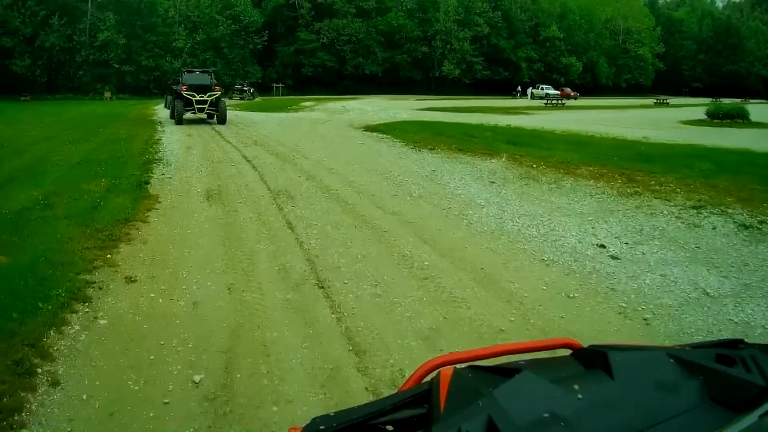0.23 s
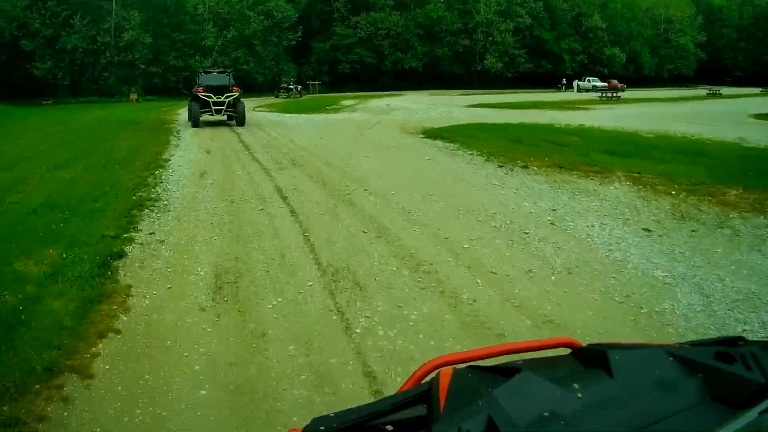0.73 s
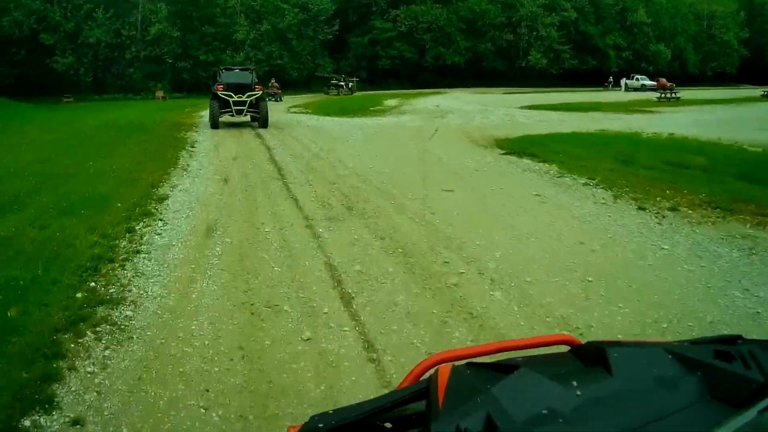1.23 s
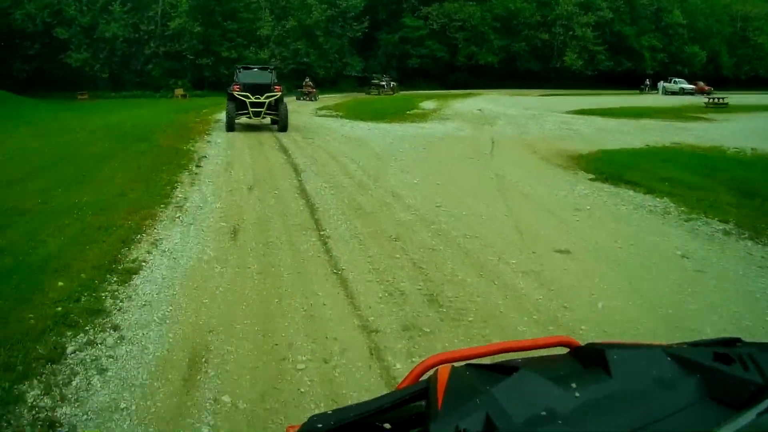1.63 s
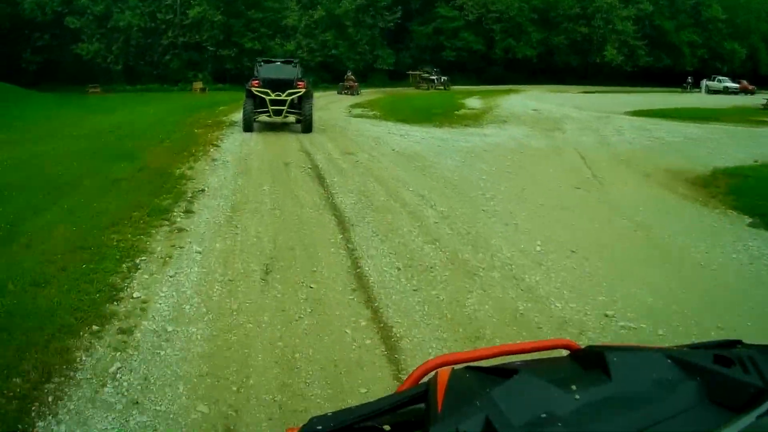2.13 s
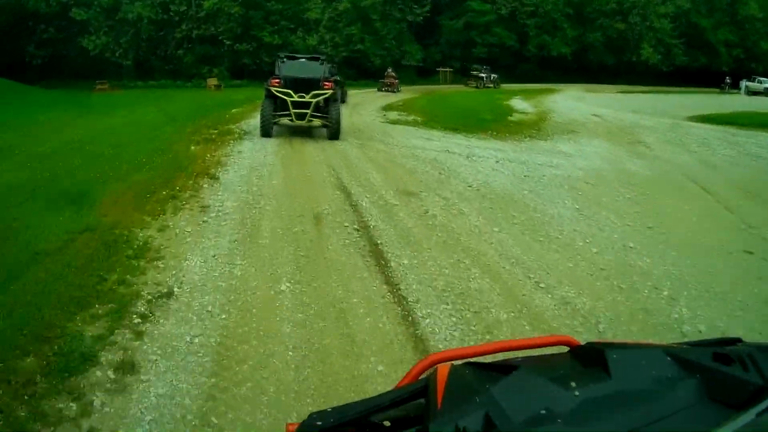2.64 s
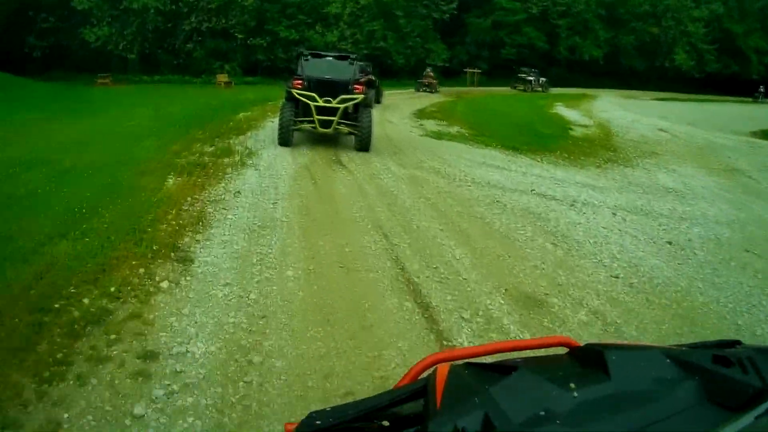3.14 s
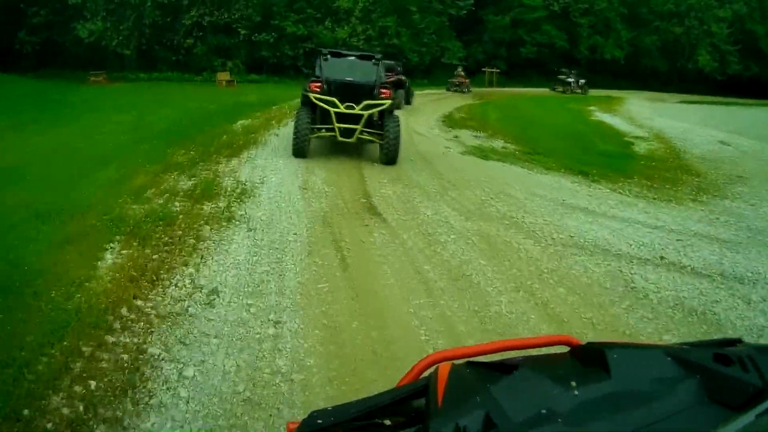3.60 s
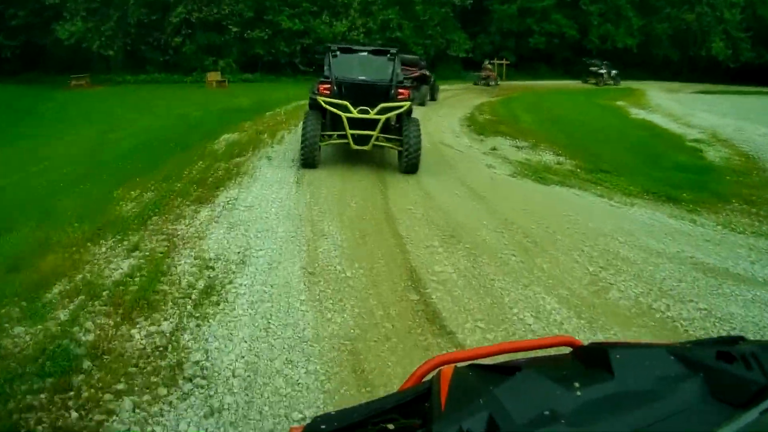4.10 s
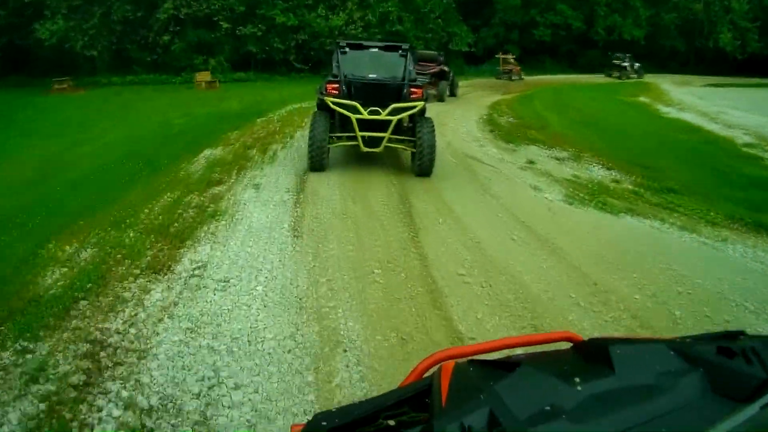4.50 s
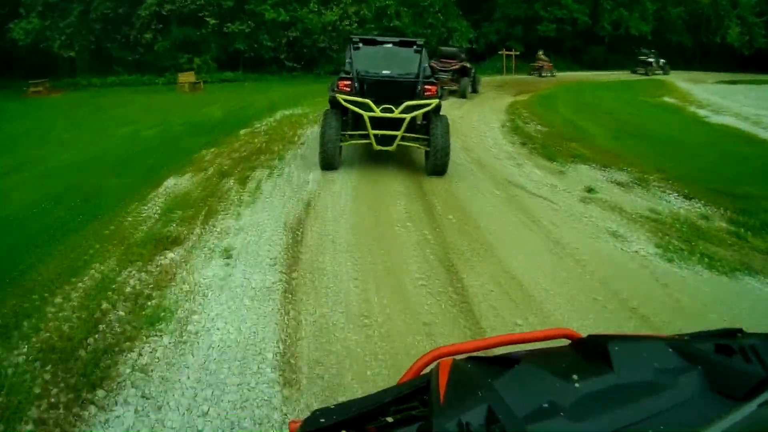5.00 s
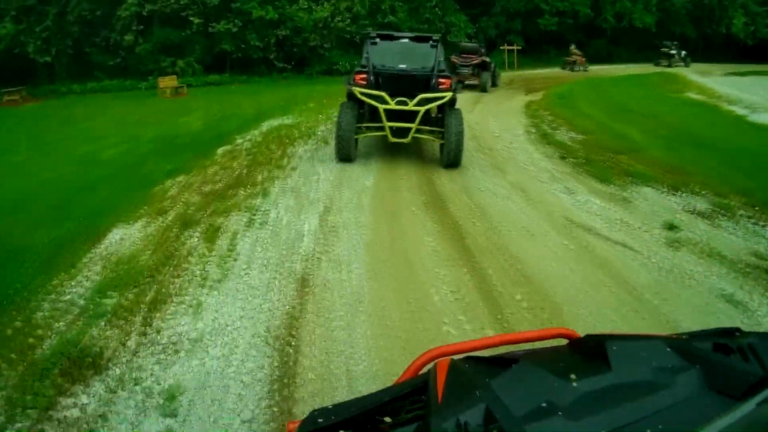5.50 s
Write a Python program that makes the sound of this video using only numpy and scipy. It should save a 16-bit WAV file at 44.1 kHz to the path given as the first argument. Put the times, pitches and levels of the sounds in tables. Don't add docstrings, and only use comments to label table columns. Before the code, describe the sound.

Outdoors on a gravel road, close onboard sound: twin-cylinder exhaust growl, body roar and rumble, bright tyre crunch and wind gusts. The engine eases down from about two seconds, with loose panel rattles and stone ticks, then coasts from three. Knocks come in quick clusters, another engine's low drone rises, gravel gets looser, and the throttle bites again near the end.

```python
import sys
import numpy as np
from scipy import signal
from scipy.io import wavfile
from scipy.ndimage import uniform_filter1d

SR = 44100
rng = np.random.default_rng(int(sys.argv[2]) if len(sys.argv) > 2 else 0)


def output_pcm(signal):
    pcm = np.clip(np.atleast_2d(signal).T, -1, 1) * 32767
    wavfile.write(sys.argv[1], SR, np.round(pcm).astype(np.int16))


def convert_level_to_amplitude(level_db):
    exponent = np.asarray(level_db, float) / 20
    return 10 ** exponent


N = 253575


def evened(x):
    return x / np.sqrt(np.mean(x ** 2) + 1e-20)


def read(points, hz):
    f, value = np.transpose(points)
    return np.interp(np.log(hz + 1), np.log(f + 1), value)


def curve(rows):
    s, value = np.transpose(rows)
    return np.interp(np.arange(N) / SR, s, value)


def drift(hz, count):
    steps = rng.standard_normal((count, 1200))
    smooth = signal.filtfilt(*signal.butter(2, hz / 100), steps)
    at = np.arange(N) / SR * 200
    return [np.interp(at, np.arange(1200), evened(row)) for row in smooth]


def noise(spectrum, size, patchy_db, flicker_db):
    frames, hz = 4 * N // size + 5, np.fft.rfftfreq(size, 1 / SR)
    a, b, patches = rng.standard_normal((frames, len(hz), 3)).T
    patches = uniform_filter1d(patches, size=6, axis=0)
    patches = evened(uniform_filter1d(patches, size=8, axis=1))
    flicker = evened(uniform_filter1d(rng.standard_normal(frames), size=3))
    level_db = read(spectrum, hz)[:, None] + patchy_db * patches + flicker_db * flicker
    z = (a + 1j * b) * convert_level_to_amplitude(level_db)
    return evened(signal.istft(z, nperseg=size, noverlap=3 * size // 4)[1][:N])


def ring(hz, t60):
    t, rise_s = np.arange(3000) / SR, .0007
    return np.minimum(t / rise_s, 1) * convert_level_to_amplitude(-60 * t / t60) * np.sin(2 * np.pi * hz * t)


# time in seconds, firing cycles per second.
SPEED = [(0, 41.45), (.72, 41.58), (1.4, 41.45), (1.56, 40.75), (1.7, 39.2), (1.924, 37.52), (2.138, 36.63),
         (2.6, 35.77), (2.772, 34.37), (2.948, 33.6), (3.2, 30.3), (3.55, 28.7), (4.5, 25.85),
         (5.11, 22.45), (5.3, 28.2), (5.42, 29.35), (5.62, 29.35), (5.75, 30.2)]


def engine_speed():
    return curve(SPEED)


# time in seconds, opening from 0 (shut) to 1 (open).
THROTTLE = [
    (0, 1.),
    (2.6, 1.),
    (2.92, .75),
    (3.05, .08),
    (5.09, .03),
    (5.16, .9),
    (5.3, 1.),
    (5.75, 1.),
]


def throttle_opening():
    return curve(THROTTLE)


# pitch in Hz, width in Hz, level in dB.
PIPE = [(111.4, 26, 9.5), (274.3, 19.6, 13.5), (355.4, 64, 9), (460, 5.1, 8.5), (544, 21, 12), (706, 58, 8),
        (1000, 4.3, -6), (1363, 29, 8)]


def pipe(hz):
    return 1 + sum(convert_level_to_amplitude(db) / (1 + 2j * (hz - f) / width) for f, width, db in PIPE)


# time in seconds, level in dB.
EFFORT = [(0, -9), (1.3, -9), (1.42, -9.5), (1.56, -10.5), (1.68, -8), (2.0, -9), (2.6, -10), (3.0, -8.5),
          (3.15, -12), (4.4, -12.5), (4.8, -11), (5.12, -9.5), (5.2, -13.5), (5.35, -8.5), (5.55, -8),
          (5.75, -9.5)]
# multiple of firing cycle, level in dB.
PULLING = [(1, -6.5), (2, -23), (3, -22), (4, 2.5), (5, -12), (6, -9), (7, -21), (8, -6.5), (9, 1.5),
           (10, -6.5), (11, -1), (12, 7), (13, -7), (14, -11.5), (15, -35), (16, -6), (17, -5), (18, -25.5),
           (19, -31.5), (20, -29), (21, -20), (22, -24), (23, -28.5), (24, -6), (25, -31), (26, -16),
           (27, -21.5), (28, -12.5), (29, -14.5), (30, -28.5), (31, -33), (32, -22), (33, -26), (34, -15.5)]
FADING = [(1, -8), (2, -27), (3, -16), (4, 6), (5, -21), (6, -26.5), (7, -6), (8, 2.5), (9, 1.5), (10, -4),
          (11, 0.5), (12, -5.5), (13, -11), (14, -7), (15, -17), (16, -4), (17, -21), (18, -14.5),
          (19, -19), (20, -24), (21, -3), (22, -11.5), (23, -15), (24, -13), (25, -13), (26, -18.5),
          (27, -23), (28, -28), (29, -17), (30, -31), (31, -27), (32, -28), (33, -16), (34, -26.5)]
EASING = [(1, -4.5), (2, -19), (3, -10), (4, -17), (5, -8), (6, -31), (7, -7.5), (8, 0), (9, 3.5), (10, -2),
          (11, -4.5), (12, -15.5), (13, -3), (14, -25), (15, -9), (16, -12.5), (17, -32), (18, -17),
          (19, -35), (20, -7.5), (21, -16.5), (22, -14), (23, -12), (24, -39), (25, -29.5), (26, -24),
          (27, -16.5), (28, -10.5), (29, -25), (30, -39), (31, -22.5), (32, -25), (33, -36), (34, -23.5)]
SETTLING = [(1, -19), (2, -8), (3, -14.5), (4, -10), (5, -1.5), (6, -12), (7, -1), (8, -3), (9, 5),
            (10, -1.5), (11, -18), (12, -19), (13, -14.5), (14, -12.5), (15, -11.5), (16, -12), (17, -35),
            (18, -11.5), (19, -12), (20, -11.5), (21, -25), (22, -10), (23, -16), (24, -19), (25, -28.5),
            (26, -15.5), (27, -12.5), (28, -15.5), (29, -25.5), (30, -19), (31, -29), (32, -18.5),
            (33, -39), (34, -22)]
LIFTING = [(1, -2.5), (2, -10), (3, -5.5), (4, -6.5), (5, -12), (6, -15), (7, -2.5), (8, -3), (9, 3),
           (10, -17), (11, -21.5), (12, -5.5), (13, -9), (14, -11.5), (15, -29), (16, -25.5), (17, -13.5),
           (18, -3.5), (19, -29), (20, -23), (21, -11.5), (22, -14), (23, -15.5), (24, -19.5), (25, -14.5),
           (26, -23), (27, -19), (28, -16.5), (29, -32.5), (30, -24.5), (31, -35), (32, -28), (33, -24),
           (34, -30)]
CRUISING = [(1, 1), (2, -14.5), (3, -13), (4, -5.5), (5, -8.5), (6, -9.5), (7, -14.5), (8, 2), (9, 3.5),
            (10, -7.5), (11, -47), (12, -11), (13, -5.5), (14, -30), (15, -16.5), (16, -46.5), (17, -6),
            (18, -18), (19, -18), (20, -20.5), (21, -16), (22, -35), (23, -30.5), (24, -10), (25, -14.5),
            (26, -32.5), (27, -22.5), (28, -29.5), (29, -41), (30, -46), (31, -22), (32, -39.5), (33, -22),
            (34, -26)]
# multiple of firing cycle, level in dB.
COASTING = [(1, -12), (2, -7), (3, -4), (4, -7), (5, -13.5), (6, -16), (7, -21), (8, -12.5), (9, -15),
            (10, -18.5), (11, -22), (12, -17.5), (13, -23), (14, -23), (16, -21), (17, -24), (20, -32),
            (34, -37)]


def engine(turns):
    hz, throttle = engine_speed(), throttle_opening()
    speeds = np.array([29.3, 34.1, 36.1, 37.1, 38.8, 41.5])
    patterns = np.array([PULLING, FADING, EASING, SETTLING, LIFTING, CRUISING])
    trims_db = [[-3.0, 0.0036, 0.006, 0, 0.0019, 0.0052]]
    patterns_db = patterns[:, :, 1].T + trims_db
    swing = np.exp(2j * np.pi * np.interp(hz, [29.3, 34.1], [0, -.18]))
    shut_cutoff_hz, shut_lag_turns = 55.5, .19
    out = np.zeros(N)
    for k, (db, wobble) in enumerate(zip(patterns_db, drift(9.5, count=len(CRUISING))), 1):
        source_db = db - 20 * np.log10(abs(pipe(k * speeds)))
        loaded = convert_level_to_amplitude(np.interp(hz, speeds, source_db)) * swing
        shut = convert_level_to_amplitude(read(COASTING, k) + 2.0) / (1 + (shut_cutoff_hz / (k * hz)) ** 4)
        shut = shut * np.exp(-2j * np.pi * k * shut_lag_turns)
        wobble_db = (-0.11 + 1.17 * (2 - throttle)) * min(k / 6, 1) * wobble
        size = (throttle * loaded + (1 - throttle) * shut) * convert_level_to_amplitude(wobble_db)
        lag = 2 * np.pi * k * (turns - .34 - max((k + 1) // 4 - 2, 0) / 3)
        out -= (size * pipe(k * hz) * np.exp(1j * lag)).real
    return convert_level_to_amplitude(curve(EFFORT) - 7.5) * out


# time in seconds, level in dB above packed track.
GRAVEL = [(0, 0.2), (.45, -2.3), (1.0, 2), (1.5, -0.4), (2.45, 5.5), (3.15, 4), (3.6, 4.5), (3.9, 4),
          (4.2, 5.5), (4.35, 11.5), (5.5, 9.5), (5.75, 9)]


def looseness_db():
    return curve(GRAVEL)


# pitch in Hz, level in dB.
HISS = [(1500, -1.5), (2400, -17), (3000, -12), (3400, 0.5), (3900, -2), (4500, -9.5), (5350, -2),
        (6450, -9.5), (7000, -14.5), (7450, -17), (8000, -15), (8500, -18.5), (9200, -17.5), (10200, -9),
        (10700, -14), (11300, -24.5), (12500, -22.5), (14000, -31), (16000, -34.5)]


def gravel_hiss():
    grains_per_s = 310
    grit = convert_level_to_amplitude(1.4 * np.minimum(rng.exponential(1, N), 4)) * (rng.random(N) < grains_per_s / SR)
    puffs = uniform_filter1d(signal.lfilter([1], [1, -.97], grit), size=24)
    hiss = (1 + 0.025 * puffs) * noise(HISS, size=256, patchy_db=1.0, flicker_db=.8)
    return convert_level_to_amplitude(-50 + looseness_db()) * evened(hiss)


def firing_throb(turns):
    throb = 1 + 0.087 * np.cos(2 * np.pi * turns) + 0.13 * np.cos(8 * np.pi * turns)
    lump = 4 * np.cos(np.pi * (turns - 0.65)) ** 8 - 1
    return throb + 0.066 * (1 - throttle_opening()) * lump


# pitch in Hz, level in dB.
ROAR = [(80, -20), (150, -11.5), (270, -12.5), (370, -3.5), (450, -15.5), (600, -12.5), (1050, -19),
        (1200, -22), (1550, -24.5), (1760, -27.5), (1900, -31.5), (2300, -34), (3000, -45.5), (5000, -85.5)]


def body_roar(turns):
    roar_db = -23.5 + 0.64 * looseness_db() - 1.5 * (1 - throttle_opening())
    return convert_level_to_amplitude(roar_db) * firing_throb(turns) * noise(ROAR, size=1024, patchy_db=1.5, flicker_db=1.0)


# pitch in Hz, level in dB per Hz.
RUMBLE = [(50, -19), (90, -4), (150, 1), (220, -8), (300, -25.5)]
RUMBLE_END = [(600, -80), (1500, -140)]


def body_rumble(turns):
    low = noise(RUMBLE + RUMBLE_END, size=2048, patchy_db=-0.5, flicker_db=2.8)
    return convert_level_to_amplitude(-21) * firing_throb(turns) * low


# time in seconds, lift in dB, length in seconds.
GUSTS = [
    (0.382, 3, 0.083),
    (0.866, 7, 0.093),
    (1.3, 8, 0.074),
    (1.895, 1.5, 0.33),
    (2.292, 7.5, 0.45),
    (3.144, 14, 0.2),
    (3.83, 11, 0.083),
    (4.11, 4.5, 0.22),
]
# pitch in Hz, level in dB per Hz.
THUMP = [(15, -3), (27, 2.5), (40, 4), (60, -6.5), (110, -4.5), (150, -6), (220, -9), (400, -24),
         (800, -60), (1500, -130)]


def wind():
    t = np.arange(N) / SR
    gusts_db = sum(db * np.exp(-((t - s) / length) ** 2) for s, db, length in GUSTS)
    level_db = -24 + 0.23 * (engine_speed() - 41.5) + gusts_db
    return convert_level_to_amplitude(level_db) * noise(THUMP, size=4096, patchy_db=0.5, flicker_db=2.5)


def panel_buzz(turns):
    pitch_hz, width_hz = 1637, 223
    near = np.exp(-((engine_speed() - 36.0) / .22) ** 2) + convert_level_to_amplitude(-1.5) * throttle_opening()
    band = signal.butter(2, [pitch_hz - width_hz / 2, pitch_hz + width_hz / 2], "band", fs=SR)
    chopped = rng.standard_normal(N) * np.exp(-(turns % 1) / 1.6)
    return convert_level_to_amplitude(-38) * near * evened(signal.lfilter(*band, chopped))


# multiple of firing cycle, level in dB.
WHINE = [(54, -50), (59, -57.5), (68, -60.5), (154, -70)]


def gear_whine(turns):
    wobbles = drift(17, count=len(WHINE))
    whine = sum(convert_level_to_amplitude(db + 3.6 * w) * np.sin(2 * np.pi * k * turns) for (k, db), w in zip(WHINE, wobbles))
    return convert_level_to_amplitude(9 * (engine_speed() - 41.5)) * whine


# pitch in Hz, level in dB per Hz.
CLATTER = [(2200, -15), (2800, 3), (3500, -3.5), (4400, -12), (5050, -2), (5800, -23.5), (6400, -14.5),
           (7000, -18), (10500, -15), (16000, -37)]


def valve_clatter(turns):
    clatter = noise(CLATTER, size=512, patchy_db=-0.5, flicker_db=2.5)
    level_db = -52 + 0.3 * (engine_speed() - 41.5)
    return convert_level_to_amplitude(level_db) * (1 + 0.16 * np.cos(2 * np.pi * turns)) * clatter


# start in seconds, peak in dB, pitch in Hz, time to fall 60 dB in seconds.
STONES = [
    (1.836, -46, 11000, .006),
    (2.665, -43, 6500, .035),
    (2.666, -51, 9500, .03),
    (3.238, -44, 6000, .01),
    (3.439, -39, 6000, .028),
    (.318, -46, 8000, .015),
    (2.372, -49, 9000, .015),
    (.033, -46, 6000, .012),
    (4.062, -50, 12500, .006),
]
# start in seconds, peak in dB, pitch in Hz, time to fall 60 dB in seconds.
PING = (1.8357, -37, 10300, .018)


def stones():
    out, t = np.zeros(N + 3000), np.arange(3000) / SR
    for s, db, hz, t60 in STONES:
        band = signal.butter(2, [hz * 0.55, min(hz * 1.4, 2e4)], "band", fs=SR)
        puff = evened(signal.lfilter(*band, rng.standard_normal(len(t))))
        out[round(s * SR):][:len(t)] += convert_level_to_amplitude(db - 60 * t / t60) * puff
    s, db, hz, t60 = PING
    out[round(s * SR):][:len(t)] += convert_level_to_amplitude(db) * ring(hz, t60)
    return out[:N]


# time in seconds, firing cycles per second.
AHEAD_SPEED = [(1.2, 29), (2.0, 27.5), (2.6, 27), (3.13, 28), (3.55, 29.5), (4.2, 33.52), (4.62, 35.0),
               (5.0, 35.65), (5.75, 37.2)]
# time in seconds, level in dB.
AHEAD_LEVEL = [(1.2, -35), (2.6, -29.5), (2.8, -25.5), (2.95, -33), (3.1, -27.5), (3.4, -24), (3.7, -20.5),
               (3.9, -22), (4.2, -23.5), (4.4, -27), (4.62, -22), (5.0, -26.5), (5.2, -25), (5.5, -28),
               (5.75, -23.5)]
# multiple of firing cycle, level in dB.
AHEAD_TONES = [(1, -17), (2, -26), (3, -15), (4, 2.5), (5, 0), (6, -20.5), (9, -14.5), (10, -6.5)]


def vehicle_ahead():
    hz, level_db = curve(AHEAD_SPEED), curve(AHEAD_LEVEL)
    turns = np.cumsum(hz) / SR - .61
    boom_hz, boom_width_hz = 141.1, 12
    out = np.zeros(N)
    for (k, db), wobble in zip(AHEAD_TONES, drift(6, count=len(AHEAD_TONES))):
        boom = 1 + convert_level_to_amplitude(0.5) / (1 + (2 * (k * hz - boom_hz) / boom_width_hz) ** 2)
        out += convert_level_to_amplitude(db + level_db + 2.2 * wobble) * boom * np.cos(2 * np.pi * k * turns)
    return np.sqrt(2) * out


# start in seconds, peak in dB, pitch in Hz.
RATTLES = [(1.619, -23, 1530), (1.8352, -24.5, 1390), (1.948, -27, 1370), (2.177, -24, 1640),
           (2.2634, -27, 1710), (2.3191, -29, 1670), (2.4214, -31, 1580), (2.4728, -23, 1500),
           (2.4903, -19, 1580), (2.5416, -17.5, 1586), (2.6035, -22, 1445), (2.665, -30, 1600),
           (2.7187, -29, 1560), (2.7831, -25, 1490), (3.001, -29, 1570), (4.49, -35, 1360),
           (4.9453, -19.5, 1520)]


def panel_rattles():
    out = np.zeros(N + 3000)
    for s, db, hz in RATTLES:
        out[round(s * SR):][:3000] += convert_level_to_amplitude(db) * ring(hz, .054)
    return out[:N]


# start in seconds, peak in dB, pitch in Hz.
KNOCKS = [(1.639, -5, 716), (1.949, -5, 600), (1.982, -7, 483), (2.059, -8.5, 506), (2.192, -9, 584),
          (2.721, -5, 544), (2.858, -12, 541), (3.229, -9.5, 633), (3.362, -11.5, 705), (3.437, -7, 662),
          (3.507, -7, 458), (3.639, -12, 555), (3.829, -17.5, 517), (3.859, -1.5, 523), (3.888, -7, 527),
          (3.915, -2, 477), (3.939, -9, 546), (3.971, -12, 476), (3.982, -10, 764), (4.059, -4, 510),
          (4.086, -4.5, 560), (4.112, -4, 460), (4.252, -2.5, 538), (4.28, -15, 533), (4.338, -17, 565),
          (4.416, -9, 730), (4.446, -6, 557), (4.47, -3, 450), (4.527, -9, 730), (4.6, -6.5, 520),
          (4.659, -4, 454), (4.685, -19, 716), (4.766, -3.5, 452), (4.817, -3.5, 452), (4.904, -24, 690),
          (4.924, -15, 452), (4.978, 0, 470), (5.022, -4, 560), (5.102, -9.5, 760), (5.166, -3, 453),
          (5.442, -11, 549), (5.55, 1, 450), (5.618, -10, 705)]


def knocks():
    out, late_s = np.zeros(N + 3000), .0021
    for s, db, hz in KNOCKS:
        out[round((s + late_s) * SR):][:3000] -= convert_level_to_amplitude(db) * ring(hz, .02)
    return out[:N]


# centre in seconds, peak in dB, pitch in Hz.
CHUFFS = [
    (4.800, -0.5, 344),
    (4.852, -20, 328),
    (4.934, -4.5, 304),
    (5.117, -6.5, 350),
    (5.150, -7, 296),
    (5.187, -2, 312),
    (5.228, -7.5, 331),
    (5.300, -4.5, 347),
    (5.372, -6, 348),
    (5.444, -21, 350),
]


def chuffs():
    out, t = np.zeros(N + 2000), (np.arange(2000) - 1000) / SR
    for s, db, hz in CHUFFS:
        burst = np.cos(2 * np.pi * hz * t) * np.exp(-(t / 0.0041) ** 2)
        out[round(s * SR) - 1000:][:len(t)] -= convert_level_to_amplitude(db) * burst
    return out[:N]


def scene():
    turns = np.cumsum(engine_speed()) / SR + 0.002 * drift(9, count=1)[0]
    out = engine(turns) + gravel_hiss() + body_roar(turns) + body_rumble(turns) + wind()
    out += panel_buzz(turns) + gear_whine(turns) + valve_clatter(turns)
    out += stones() + vehicle_ahead() + panel_rattles() + knocks() + chuffs()
    return out[None]


def band_limit(x):
    return signal.sosfilt(signal.butter(12, 15700, fs=SR, output="sos"), x)


def record(dry):
    knee, top = .7, .985
    over = np.maximum(abs(dry) - knee, 0)
    rounded = (top - knee) * np.tanh(over / (top - knee))
    held = dry - np.sign(dry) * (over - rounded)
    return band_limit(held)


dry = scene()
out = record(dry)
output_pcm(out)
```